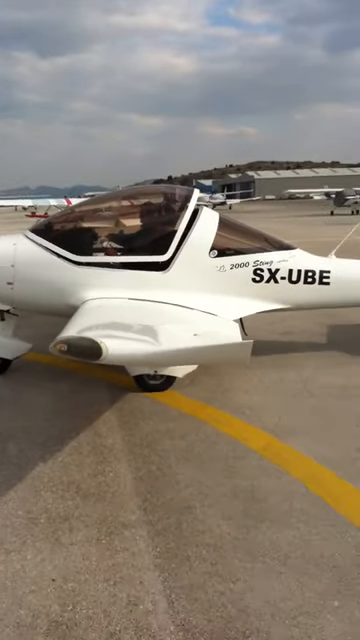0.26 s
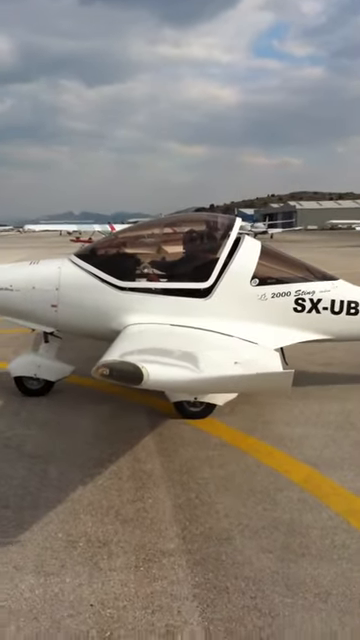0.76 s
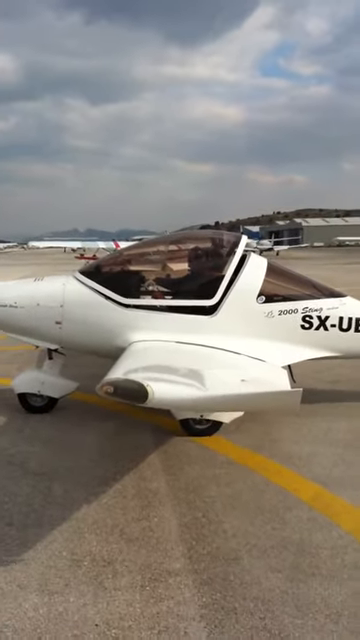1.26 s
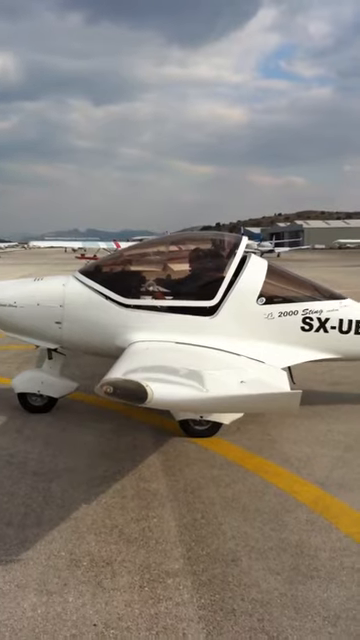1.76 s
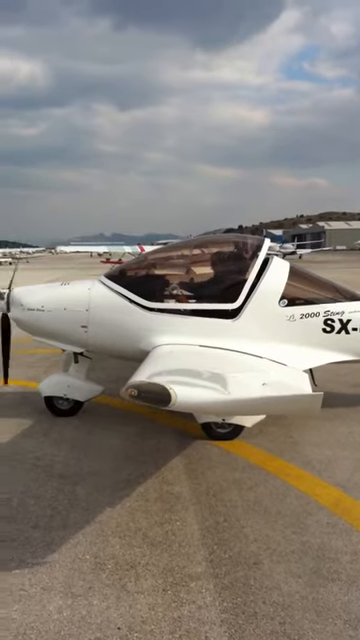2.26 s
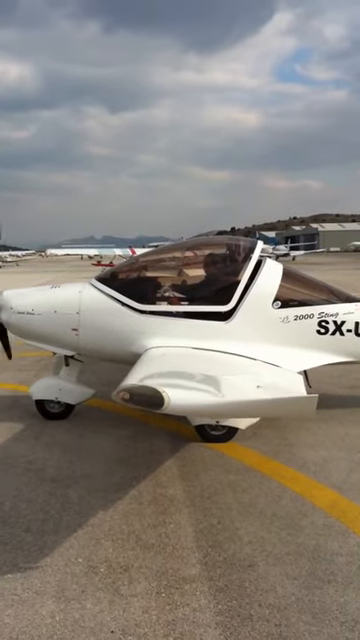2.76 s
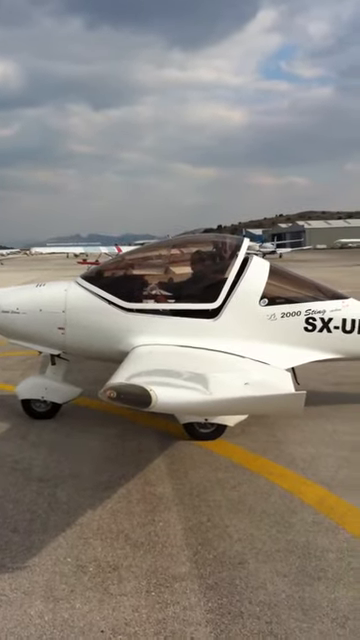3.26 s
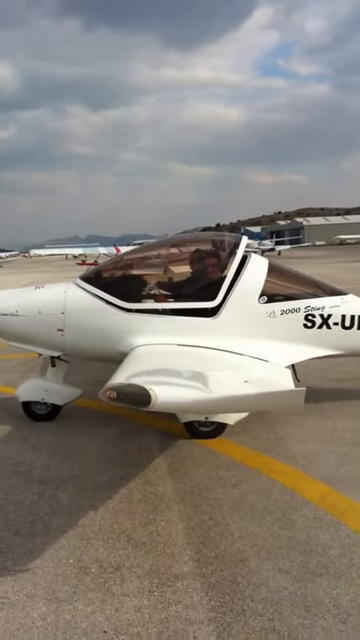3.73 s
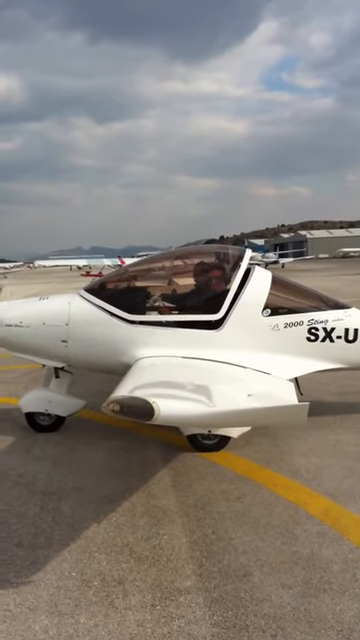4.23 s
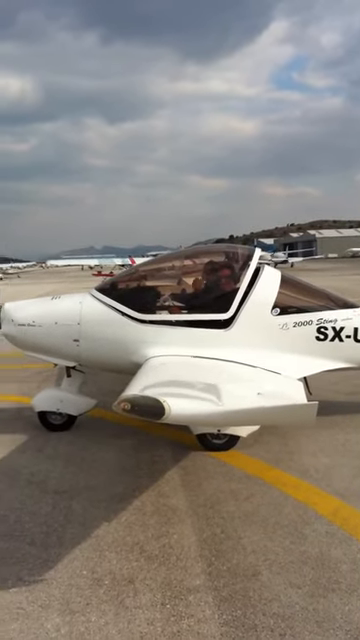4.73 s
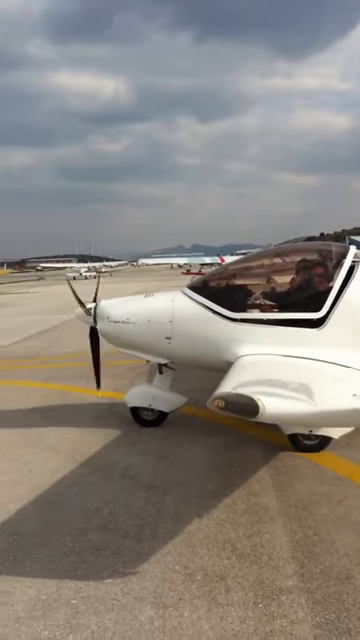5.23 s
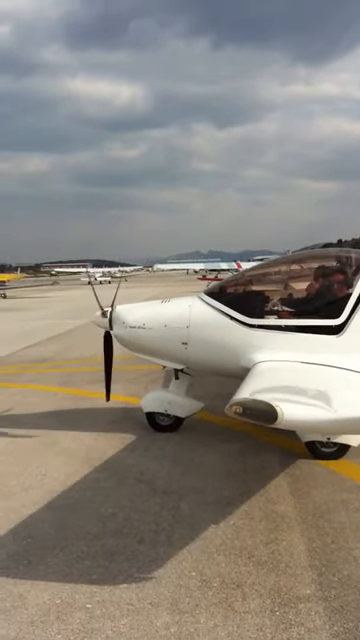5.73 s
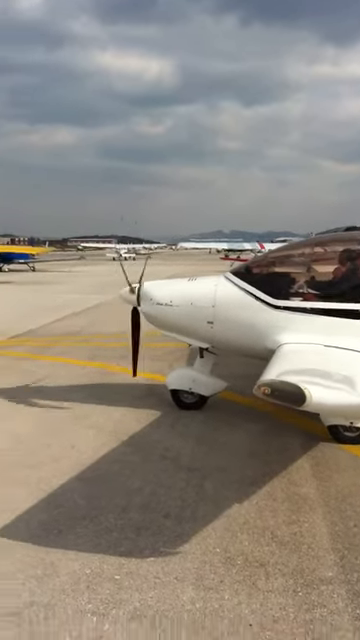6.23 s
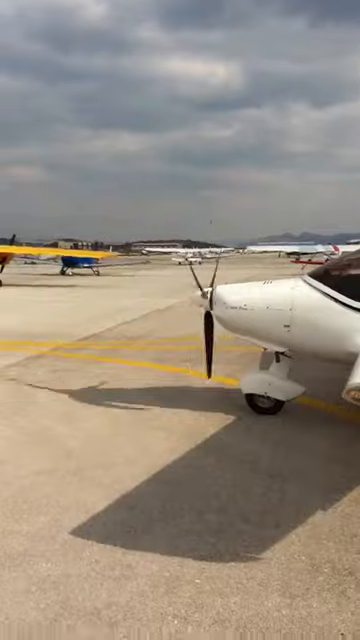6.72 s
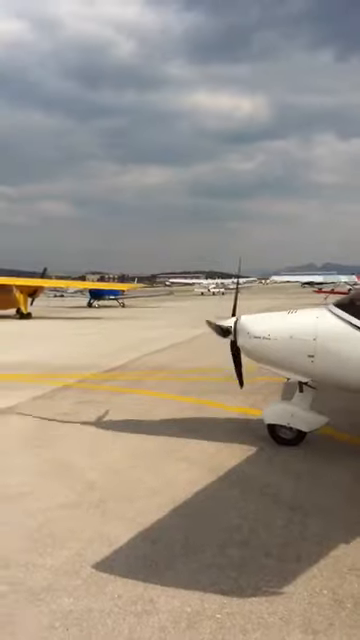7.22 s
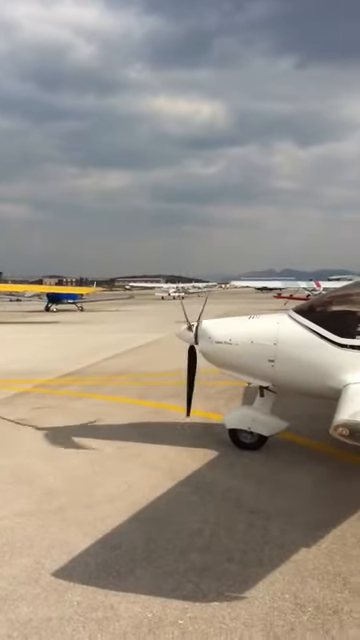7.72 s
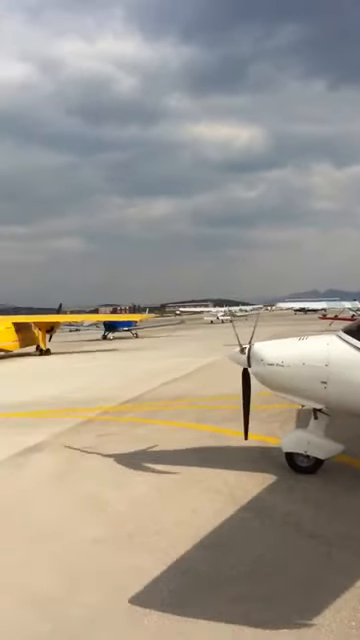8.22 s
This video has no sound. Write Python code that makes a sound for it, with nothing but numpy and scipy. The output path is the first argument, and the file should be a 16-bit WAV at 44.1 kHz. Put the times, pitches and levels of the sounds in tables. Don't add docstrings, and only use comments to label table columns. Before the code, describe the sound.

Rapid whistling propeller swishes over an uneven, ticking piston idle that gradually speeds up, repeatedly buried by rough wind buffeting on an open airfield.

```python
import sys
import numpy as np
from scipy import signal
from scipy.fft import rfft, irfft, next_fast_len
from scipy.io import wavfile
from scipy.ndimage import uniform_filter1d, map_coordinates

SR = 44100
rng = np.random.default_rng(int(sys.argv[2]) if len(sys.argv) > 2 else 0)


def makeup_ratio(level_db):
    decades = np.asarray(level_db, float) / 20
    return 10 ** decades


def persist_wave(psi):
    counts = np.round(np.clip(psi, -1, 1) * 32767).astype(np.int16)
    wavfile.write(sys.argv[1], SR, np.atleast_2d(counts).T)


N = 373968

# start in seconds, end in seconds, level in dB at the
# start, level in dB at the end, flutter in dB against the push.
SWELLS = [(0, .76, -45, -46, -6), (.76, 0.923, -45, -16, -19), (1.068, 1.745, -27, -22.5, -12),
          (1.761, 2.097, -18.5, -32.5, -13), (1.88, 1.964, -22, -21.5, 3.5),
          (2.19, 2.418, -26.5, -19.5, -10), (2.466, 2.772, -33, -55, -23), (2.79, 2.898, -31, -21.5, -13.5),
          (2.998, 3.932, -41, -30.5, -20), (3.989, 4.98, -40.5, -32.5, -14), (5.005, 5.567, -25, -21, -7.5),
          (5.569, 5.737, -15, -14, -2), (5.807, 6.09, -34.5, -22, -10), (6.292, 6.805, -17.5, -19.5, -8),
          (6.846, 7.484, -35.5, -36, -12), (7.496, 7.797, -34, -23, -5), (7.804, 8.032, -21, -19.5, -2.5),
          (8.06, 8.48, -38.5, -33, -1)]
# peak time in seconds, level in dB, half
# length in seconds.
THUDS = [(0.393, -28.5, .03), (1.003, -23, 0.016), (1.185, -20, 0.019), (1.249, -16, 0.016),
         (1.354, -24, 0.013), (1.424, -26, .018), (1.521, -23, 0.013), (1.558, -19, 0.01),
         (2.063, -19, .01), (2.342, -19, .015), (2.854, -25, 0.024), (3.223, -29.5, 0.033),
         (3.32, -25, 0.012), (3.46, -20.5, 0.01), (3.926, -17.5, 0.017), (4.235, -26, 0.017),
         (4.528, -22.5, 0.015), (4.718, -23.5, 0.025), (4.805, -23.5, 0.032), (5.06, -17, .014),
         (5.133, -15, 0.0088), (6.023, -14.5, 0.0062), (6.49, -11.5, .02), (6.678, -10, 0.01),
         (7.611, -18, 0.021), (7.77, -11, 0.011), (8.056, -27, .012), (3.776, -37, 0.025),
         (4.65, -29, 0.019)]
# peak time in seconds, level in dB, half length in seconds,
# flutter in dB and rasp in dB, both against the thud.
TEARS = [(0.903, -13.5, 0.0093, -4, -26), (1.134, -16, 0.017, -3, -13.5), (1.645, -12, 0.023, -2, -6),
         (1.828, -13, 0.02, -2, -3), (1.909, -17.5, 0.016, -9, 4), (1.962, -17.5, 0.011, 1.5, -6.5),
         (2.172, -15.5, 0.018, -9, -16.5), (2.27, -9, 0.018, -5.5, -25.5), (2.308, -6, 0.005, -9, -24),
         (2.402, -15, 0.019, 0, -12), (4.998, -12.5, .01, -13, -27), (5.202, -11.5, 0.017, 1, -9.5),
         (5.238, -23, 0.029, 2.5, 0), (5.487, -20.5, 0.021, 1, -9.5), (5.666, -16, 0.026, -8, -6.5),
         (6.103, -8.5, 0.027, -6, -18.5), (6.213, -17.5, 0.03, -6, -17.5), (6.353, -16, 0.049, -2.5, -13),
         (6.55, -10, 0.021, -10, -19.5), (6.733, -10.5, 0.019, -4, -17), (6.785, -10, 0.013, -7, -18),
         (7.71, -15.5, 0.023, -12.5, -19), (7.804, -12, 0.0094, -6, -30), (7.978, -11.5, 0.026, -2.5, -6.5)]
# time in seconds, peak level in dB.
SNAPS = [(0.903, -3), (1.122, -17), (1.136, 0), (1.614, -23), (1.633, -3), (1.803, 1), (1.876, 0),
         (1.901, 3), (1.958, -3), (2.253, -5), (2.305, -5), (5.005, -13), (5.247, -7), (5.189, -19),
         (5.195, -1), (5.292, -4), (5.478, -5.5), (5.568, -4), (6.069, -8), (6.214, -6), (6.367, -11),
         (6.469, -6.5), (6.552, -5), (6.723, -32), (7.793, -11), (7.804, -9), (7.837, -7), (7.885, -8),
         (7.901, 1.5), (7.92, -11)]
# frequency in Hz, density in dB per Hz.
BUFFET_COLOUR = [(25, -26), (60, -21.5), (120, -2), (200, 2.5), (330, -1.5), (440, -15), (600, -23.5),
                 (1000, -63)]
# frequency in Hz, density in dB per Hz.
FLUTTER_COLOUR = [(250, -63), (400, -0.5), (520, -1.5), (800, -7.5), (1100, -22.5), (1700, -47.5)]
# frequency in Hz, density in dB per Hz.
RASP_COLOUR = [(500, -35), (950, 4), (1200, 3.5), (2000, -7), (3500, -23), (6000, -41), (10000, -70)]
# time in seconds, level in dB.
ENGINE_LEVEL = [(0, -40.5), (.9, -42), (1.5, -41), (2.6, -39.5), (3.4, -39.5), (3.9, -39), (4.95, -37.5),
                (5.3, -40.5), (5.8, -39.5), (6.5, -38), (7, -39.5), (7.6, -38.5), (8.48, -41.5)]
CYLINDERS = [0, -8, -1, -6]
# frequency in Hz, width in Hz, level in dB.
SILENCER = [(158.8, 79, 4), (354, 41, 2), (746, 101, 0.5), (1036, 44, -6.5), (1220, 354, -6.5),
            (1983, 400, -11.5), (2493, 290, -15)]
# frequency in Hz, width in Hz, level in dB.
HEADS = [(2467, 96, 6), (4080, 66, 3), (5346, 134, 1)]
# frequency in Hz, density in dB per Hz.
COOLING_AIR = [(500, -0.5), (900, -5), (1400, -2.5), (2600, -4.5), (3600, -8), (4800, -13), (6500, -6.5),
               (10000, -11.5), (13000, -13.5), (15500, -25)]
# time in seconds, speed in turns per second.
SPEED = [(0.0, 9.105), (0.3, 9.12), (0.6, 8.759), (0.9, 9.167), (1.2, 9.459), (1.5, 10.215), (1.8, 10.779),
         (2.1, 10.879), (2.4, 10.966), (2.7, 11.274), (3.0, 11.194), (3.3, 11.104), (3.6, 11.595),
         (3.9, 11.212), (4.2, 11.758), (4.5, 12.518), (4.8, 13.026), (5.1, 13.281), (5.4, 13.469),
         (6.2, 13.371), (7.0, 13.492), (7.7, 13.427), (8.48, 13.383)]
# place in turns, pitch mismatch as a fraction, level in dB.
BLADES = [(0, .065, -0.34), (1 / 3, -0.081, 0.62), (2 / 3, 0.0028, -.1)]
# time in seconds, level in dB.
WHISTLE_LEVEL = [(0, -34.5), (.66, -35), (.95, -36), (3.71, -29.5), (4.04, -32), (4.7, -24), (5.18, -26.5),
                 (5.3, -29), (5.7, -26.5), (6.3, -25), (7.3, -27), (7.6, -24.5), (8.48, -29)]
# frequency in Hz, density in dB per Hz.
TIP_HISS = [(5000, -40), (8500, -16), (10800, 6), (13000, -7), (15500, -1)]
# time in seconds, bearing from 0 (wing) to 1 (front).
BEARING = [(0, 0.043), (1.2, 0.54), (2.5, 0.37), (4.2, 0.54), (5, .67), (6.5, .8), (8.4, 1)]
# bearing from 0 to 1, top pitch in Hz per turn a second, share of the blade
WHISTLE_BY_BEARING = [
    (0, 845, .36, 2.6),
    (.45, 763.6, .88, 1.5),
    (.7, 738, .9, 1.33),
    (1, 746, 0.99, 1.35),
]

SWELL_IN_S, SWELL_OUT_S = 0.0094, 0.013
RASP_GROWS, RASP_DB = 1.38, -8.5
THUD_FLUTTER_DB, THUD_RASP_DB = -17, -28
FALL_OVER_RISE, ROUND = 0.82, 1.78
EDGE_DB, RASP_GRAIN_DB = -31, 3
GEAR = 2.43
TICK_DB, TICK_SCATTER_DB = -11, 3
PITCH_LUCK = 0.012
LEAN_WING, LEAN_FRONT = 0.042, -0.029
HISS_DB, HALO_DB, CORE_CLEAN = -21, -6.5, 1.2
KNEE_DB, SQUEEZE, RELEASE_S = -20, 0.31, 0.27


def unit(x):
    return x / np.sqrt(np.mean(np.abs(x) ** 2) + 1e-20)


def curves(rows):
    s, *cols = np.transpose(rows)
    return [np.interp(np.arange(N) / SR, s, c) for c in cols]


def wobble(rate):
    knots = rng.standard_normal(int(N * rate / SR) + 4)
    return map_coordinates(knots, [np.arange(N) * rate / SR])


def filtered(x, response):
    m = next_fast_len(N + SR // 2)
    return irfft(rfft(x, m) * response(np.fft.rfftfreq(m, 1 / SR)), m)[:N]


def colour(points):
    f, db = np.transpose(points)
    return lambda hz: makeup_ratio(np.interp(np.log(hz + 1), np.log(f), db))


def resonant(modes):
    return lambda f: sum(makeup_ratio(db) * (1j * f * w / (c * c - f * f + 1j * f * w)) ** 2 for c, w, db in modes)


def beats(count, scatter_db, pattern):
    at = np.flatnonzero(np.diff(np.floor(count)))
    x = np.zeros(N)
    x[at] = makeup_ratio(np.resize(pattern, len(at)) + scatter_db * rng.standard_normal(len(at)))
    return x


def gusts():
    t = np.arange(0, N + 64, 64) / SR
    power = 0
    for start, end, from_db, to_db, flutter in SWELLS:
        outside = np.maximum((start - t) / SWELL_IN_S, (t - end) / SWELL_OUT_S)
        db = np.interp(t, [start, end], [from_db, to_db]) - 10 * np.maximum(outside, 0)
        rasp = RASP_GROWS * flutter + RASP_DB
        power = power + makeup_ratio(db + np.c_[[0, flutter, rasp]]) ** 2
    soft = [(*row, THUD_FLUTTER_DB, THUD_RASP_DB) for row in THUDS]
    for s, peak, half, flutter, rasp in [*TEARS, *soft]:
        away = np.where(t < s, s - t, (t - s) / FALL_OVER_RISE) / half
        power = power + makeup_ratio(peak - 6 * away ** ROUND + np.c_[[0, flutter, rasp]]) ** 2
    return [np.interp(np.arange(N) / SR, t, np.sqrt(p)) for p in power]


def eddies(spectrum, grain, span):
    x = filtered(rng.standard_normal(N) * grain, colour(spectrum))
    return x / np.sqrt(np.abs(uniform_filter1d(x * x, size=round(span * SR))) + 1e-12)


def torn(gust):
    return np.sqrt(np.maximum(gust ** 2 - makeup_ratio(-37) ** 2, 0))


def snaps():
    thumps, edges = np.zeros(N), np.zeros(N)
    for s, db in SNAPS:
        at = round(s * SR) + 60
        thumps[at] = makeup_ratio(db + 24.5) * rng.choice([-1, 1])
        edges[at] = makeup_ratio(db + EDGE_DB - 5) * rng.choice([-1, 1])
    both = filtered(thumps, resonant([(685, 970, 0)])) + filtered(edges, resonant([(1900, 2200, 0)]))
    return filtered(both, lambda f: 1 / (1 + 1j * f / 2600) ** 2)


def wind():
    push, flap, tear = gusts()
    lumps = wobble(60)
    buffet = push * eddies(BUFFET_COLOUR, makeup_ratio(3.96 * lumps), span=0.037)
    deep = filtered(buffet, lambda f: 1 / (1 + (f / 160) ** 4))
    buffet = buffet - 0.85 * deep * flap / (flap + makeup_ratio(-24))
    flutter = torn(flap) * eddies(FLUTTER_COLOUR, makeup_ratio(2.5 * lumps), span=0.03)
    spikes = makeup_ratio(RASP_GRAIN_DB * (lumps + wobble(260)))
    rasp = torn(tear) * eddies(RASP_COLOUR, spikes, span=0.052)
    return makeup_ratio(0.5) * buffet + makeup_ratio(1.0) * flutter + makeup_ratio(2.0) * rasp + snaps()


def turns():
    return np.cumsum(curves(SPEED)[0]) / SR + 1 / 75


def engine():
    level_db, = curves(ENGINE_LEVEL)
    strokes = 2 * GEAR * turns()
    firings = beats(strokes, scatter_db=1.2, pattern=CYLINDERS)
    soft = filtered(unit(firings), lambda f: 1 / (1 + 1j * f / 750) ** 2)
    blowdown = np.exp(-3.5 * (strokes % 1))
    rush = unit(rng.standard_normal(N) * (3.3 + blowdown))
    exhaust = unit(filtered(soft + 0.85 * rush, resonant(SILENCER)))
    taps = beats(strokes + 0.48, scatter_db=TICK_SCATTER_DB, pattern=[-8, -9, -41, -4.5])
    ticks = unit(filtered(taps, resonant(HEADS)))
    swish = 1 + 0.3 * np.cos(6 * np.pi * turns())
    draught = rng.standard_normal(N) * (3.7 + blowdown) * makeup_ratio(0.98 * wobble(25))
    air = swish * unit(filtered(draught, colour(COOLING_AIR)))
    return makeup_ratio(level_db) * (makeup_ratio(6.5 + 1.3 * wobble(7.2)) * exhaust + makeup_ratio(TICK_DB) * ticks + makeup_ratio(2.0) * air)


def aspect():
    bearing, = curves(BEARING)
    at, *cols = np.transpose(WHISTLE_BY_BEARING)
    lean = LEAN_WING + (LEAN_FRONT - LEAN_WING) * bearing
    return *[np.interp(bearing, at, c) for c in cols], lean


def propeller():
    hz_per_turn, share, slide, lean = aspect()
    pitch, angle = hz_per_turn * curves(SPEED)[0], turns()
    out = np.zeros(N)
    for place, mismatch, db in BLADES:
        swing = angle + lean - place
        off = (swing + 0.5) % 1 - 0.5
        passes = np.floor(swing + 1.5).astype(int)
        pitch_luck, level_luck, hiss_luck = rng.standard_normal((200, 3))[passes].T
        bent = off * (1 - 7 * lean * np.tanh(25 * off))
        sweep = 1 - slide * (np.hypot(bent, 0.03) - 0.03) * (1 - 0.8 * np.abs(bent))
        tuning = 0.95 + share * mismatch + PITCH_LUCK * pitch_luck
        carrier = np.exp(2j * np.pi * np.cumsum(pitch * tuning * sweep) / SR)
        core = unit(CORE_CLEAN + wobble(700) + 1j * wobble(700))
        halo = unit(wobble(3400) + 1j * wobble(3400))
        beam = np.exp(-((off - 1.4 * lean) / 0.13) ** 2)
        wide = np.exp(-((off - lean) / 0.19) ** 2)
        hiss = unit(filtered(rng.standard_normal(N), colour(TIP_HISS)))
        puff = makeup_ratio(HISS_DB + 3.5 * hiss_luck) * beam ** 2 * hiss
        chirp = np.real(carrier * (beam * core + makeup_ratio(HALO_DB) * wide * halo))
        out += makeup_ratio(db + 0.7 * level_luck) * chirp + puff
    return makeup_ratio(curves(WHISTLE_LEVEL)[0] - 2.5) * unit(out)


def scene():
    return (propeller() + engine() + wind())[None]


def levelled(x):
    keep = np.exp(-1 / (RELEASE_S * SR))
    recent = signal.lfilter([1 - keep], [1, -keep], x * x)
    return x * (1 + recent / makeup_ratio(KNEE_DB) ** 2) ** (-SQUEEZE / 2)


def top_cut(x):
    return signal.sosfilt(signal.butter(12, 15730, fs=SR, output="sos"), x)


def record(dry):
    x = levelled(filtered(dry[0], lambda f: (1j * f / (1j * f + 55)) ** 2))
    x = x / (1 + np.abs(x / 0.72) ** 5) ** (1 / 5)
    x = filtered(x, lambda f: 1j * f / (1j * f + 35))
    return top_cut(x[None])


dry = scene()
out = record(dry)
persist_wave(out)
```